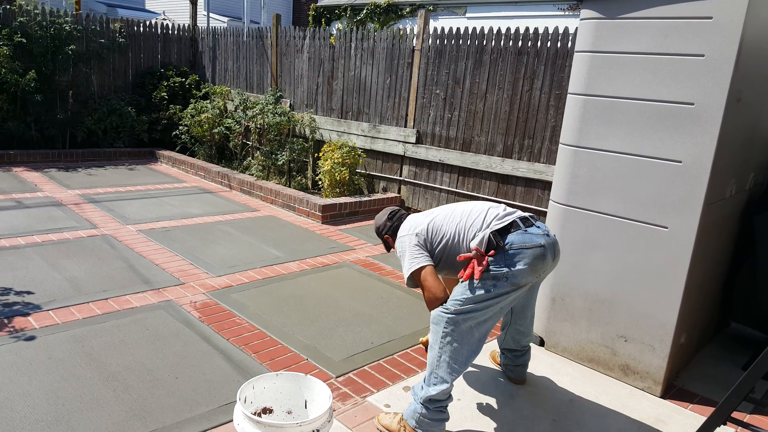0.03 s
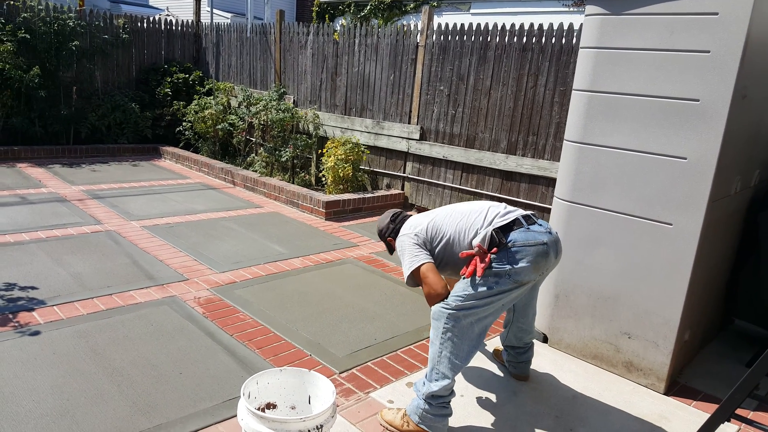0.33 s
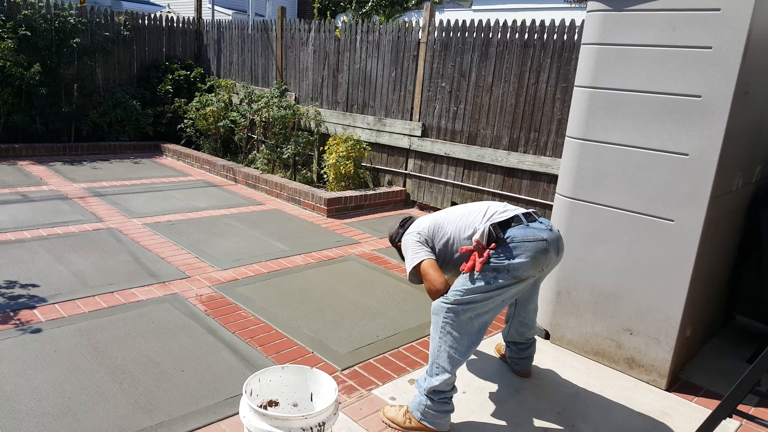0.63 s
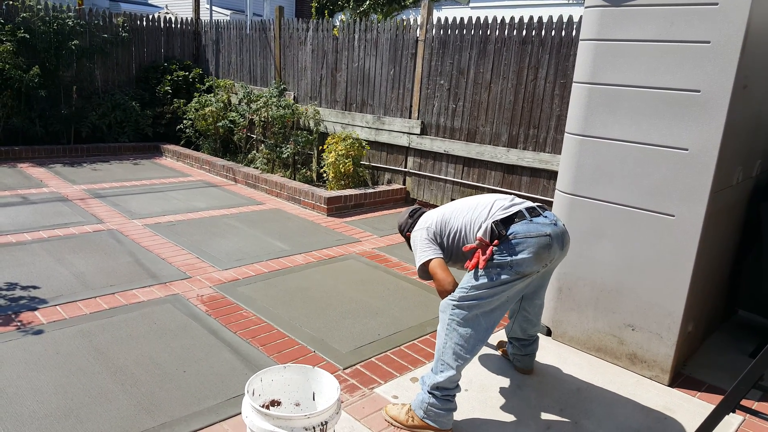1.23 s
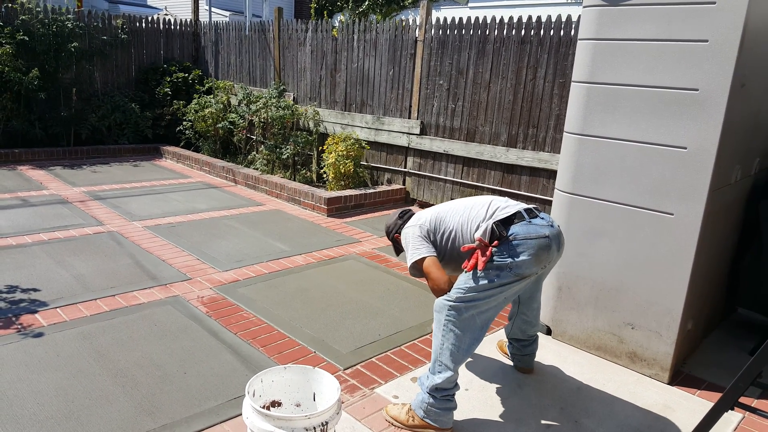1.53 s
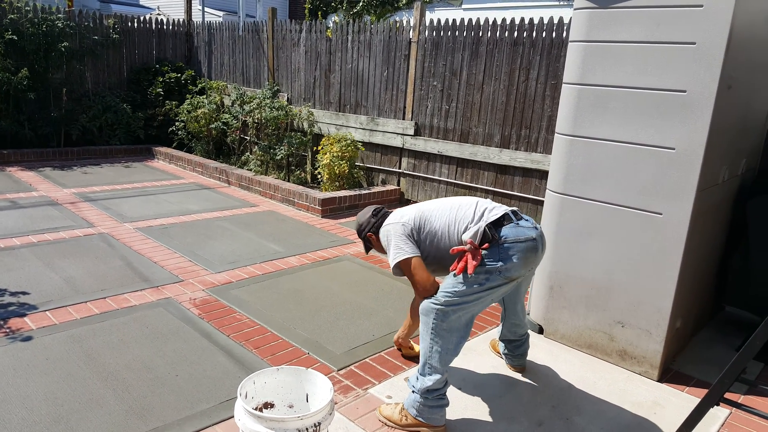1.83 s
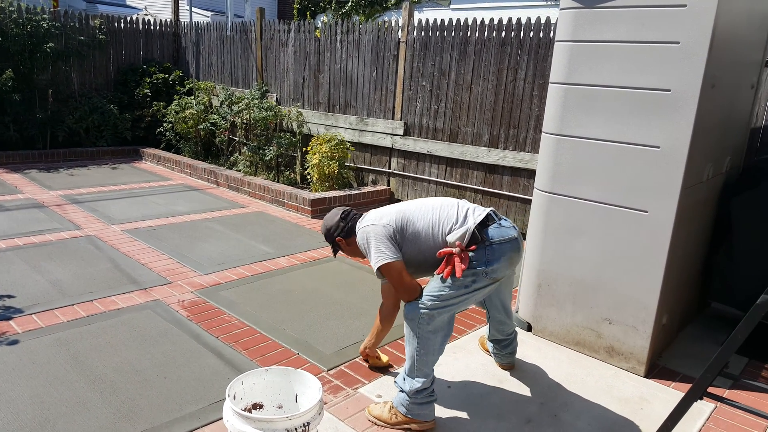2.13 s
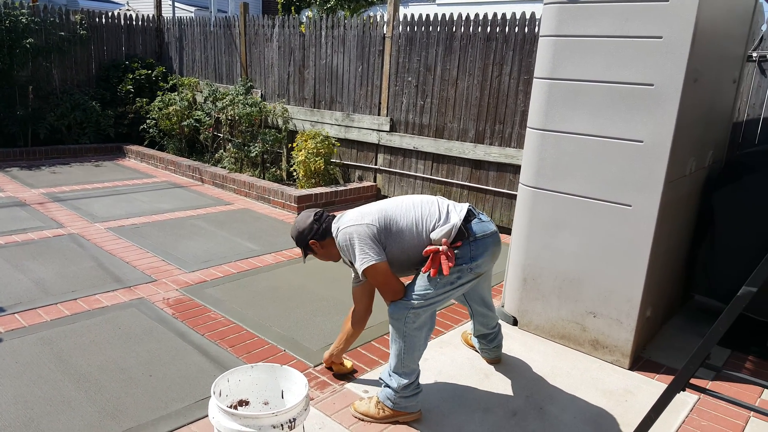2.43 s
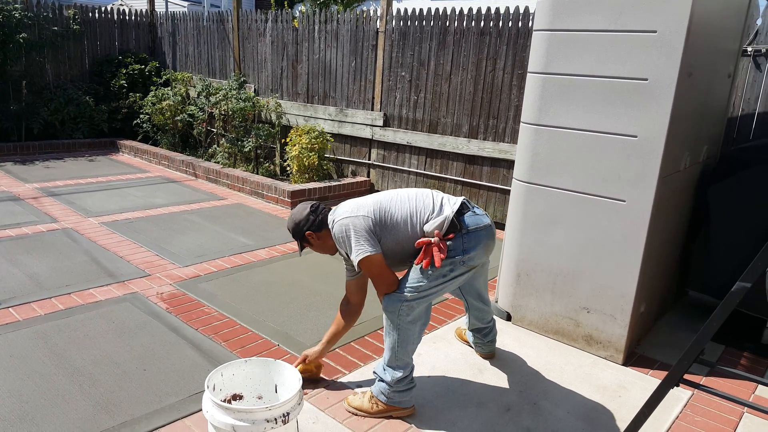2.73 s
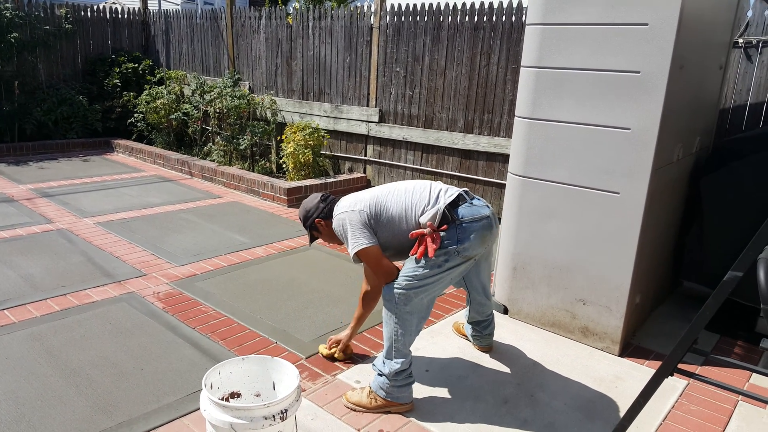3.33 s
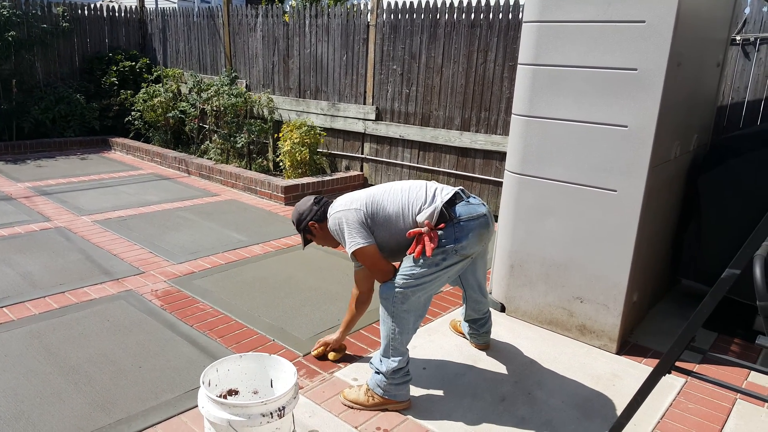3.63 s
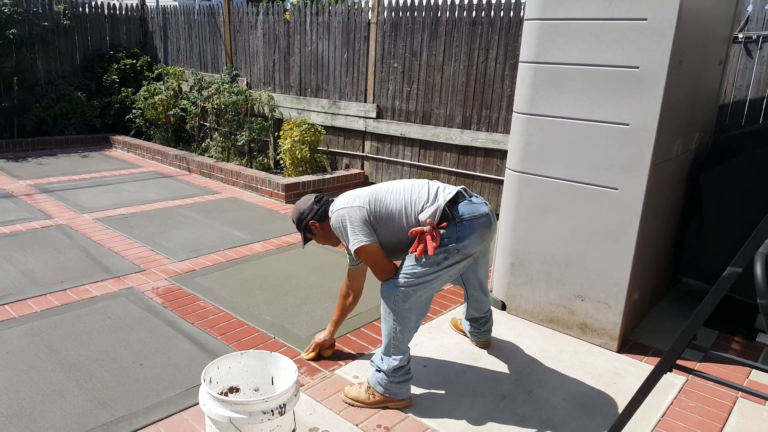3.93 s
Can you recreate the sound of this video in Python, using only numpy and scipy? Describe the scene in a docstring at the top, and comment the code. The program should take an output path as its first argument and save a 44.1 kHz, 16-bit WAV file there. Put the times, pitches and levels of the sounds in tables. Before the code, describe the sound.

A hand pad scrubs gritty brick in a fenced backyard. After a brief scuff, something hollow bumps and rattles twice; then come one long sandy stroke and a few short wipes, in front of the microphone over a low rumble.

```python
"""A brief scuff, then something hollow is bumped out of sight and rattles; a second bump follows.
In front of a stereo microphone in a fenced backyard, a worker scrubs gritty brick joints with a hand
pad: one long stroke and a few short wipes. Sand grains rasp, hiss and tick under the pad, and paving,
wall and fence throw the sound back. Behind it lie a low outdoor rumble, the hum of a distant machine,
a faint high whine and a thin, far-off hiss."""
import sys
import numpy as np
from scipy import signal
from scipy.fft import rfft, irfft
from scipy.io import wavfile
from scipy.ndimage import uniform_filter1d

SR = 44100
rng = np.random.default_rng(int(sys.argv[2]) if len(sys.argv) > 2 else 0)


def persist_wave(psi):
    """Save psi, clipped to +-1, as 16-bit WAV."""
    counts = np.round(np.clip(psi, -1, 1) * 32767).astype(np.int16)
    wavfile.write(sys.argv[1], SR, np.atleast_2d(counts).T)


N = 176400
T = np.arange(N) / SR


# The long stroke on the brick (time [s], rasp [dB], hiss [dB], resonance [Hz], its height [dB])
LONG_STROKE = [(1.40, -61.5, -72, 2550, 2), (1.55, -53, -56.5, 2700, 7), (1.75, -52, -55, 2680, 6),
               (2.05, -51.5, -55, 2760, 7.5), (2.32, -48, -54.5, 2800, 1.5), (2.40, -49, -56.5, 2050, -2),
               (2.49, -48.5, -54, 2020, 4), (2.57, -47, -53.5, 1800, 4), (2.63, -45.5, -53.5, 1500, 0.5),
               (2.69, -54.5, -56.5, 1950, -1), (2.78, -74, -71, 1950, 1)]
# Short wipes and catches of the pad (peak time [s], rise [s], fall [s], rasp [dB], hiss [dB],
# resonance [Hz], its height [dB], hiss tilt [dB/octave])
WIPES = [(.005, 0.023, 0.0077, -54, -54, 2006, -7, -1.5), (.88, 0.099, 0.079, -55.5, -63.5, 1650, 6, 3),
         (.94, 0.097, 0.061, -59.5, -72, 2600, 9, 10), (1.015, 0.027, 0.014, -75, -57, 2630, 8, 1),
         (1.369, .012, .0098, -53, -59.5, 1650, 8, -3), (1.703, 0.013, 0.0086, -58, -51.5, 2500, -3, 8),
         (2.335, 0.024, 0.013, -52, -53.5, 2900, -5, -3), (2.416, 0.01, 0.0052, -43, -51, 1700, 1, 0),
         (2.635, 0.033, .012, -60, -53, 1950, 7, -1), (3.095, 0.064, .062, -60.5, -59.5, 2080, 7, 3),
         (3.165, 0.048, 0.051, -55, -56.5, 2100, 3, 1), (3.745, .077, .033, -70, -63, 2000, 4, 0.5)]
# Spectrum of the pad's rasp (frequency [Hz], relative level [dB])
RASP_SPECTRUM = [(250, -50), (600, -9.5), (1000, -.5), (1400, -3), (1900, 4.5), (2250, 2), (2850, 0),
                 (3400, -5.5), (3950, -4.5), (4600, -10.5), (7000, -15), (15000, -45)]
# Spectrum of the sand's hiss (frequency [Hz], relative level [dB])
HISS_SPECTRUM = [(1200, -35), (3000, -8), (4200, 1), (5700, 0.5), (7500, -2), (8300, -2.5), (8950, 1),
                 (9450, -0.5), (10000, 1.5), (10700, -3), (11400, -2), (12100, -4), (12800, -2.5),
                 (13700, -6), (14250, -4.5), (15700, -12)]
# Glide of the hiss peaks as the hand moves (time [s], frequency factor [ratio])
HISS_GLIDE = [(1.0, 0.88), (1.5, 0.98), (1.75, 0.93), (2.0, 1.0), (2.3, 1.005), (2.6, 1), (3.2, .985)]

def scrubbing(judder_db=0.9, judder_hz=55.3, patch_db=0.03, tilt_pivot_hz=8000):
    """The pad on brick: a resonant rasp and a sandy hiss, both juddering as the pad catches."""
    times, rasp_db, hiss_db, centre_hz, height_db = np.transpose(LONG_STROKE)
    stroking = (T > times[0]) & (T < times[-1])
    rasp_power = stroking * amp(np.interp(T, times, rasp_db)) ** 2
    hiss_power = stroking * amp(np.interp(T, times, hiss_db)) ** 2
    friction = np.array([colour(grit(), RASP_SPECTRUM), grit()])
    hz, t, (rasp_bins, hiss_bins) = signal.stft(friction, SR, nperseg=512)
    hz = hz[:, None] + 1
    stroke_ring = pad_resonance(hz, np.interp(t, times, centre_hz), np.interp(t, times, height_db))
    # Overlapping strokes share resonance and tilt in proportion to their power.
    ring = np.interp(t, T, rasp_power) * stroke_ring
    tilt = np.zeros(N)
    for peak, rise, fall, wipe_rasp_db, wipe_hiss_db, ring_hz, ring_db, tilt_db in WIPES:
        swell = np.exp(-((T - peak) / np.where(T < peak, rise, fall)) ** 2)
        wipe_rasp, wipe_hiss = swell * amp(wipe_rasp_db) ** 2, swell * amp(wipe_hiss_db) ** 2
        rasp_power += wipe_rasp
        hiss_power += wipe_hiss
        tilt += wipe_hiss * tilt_db
        ring += np.interp(t, T, wipe_rasp) * pad_resonance(hz, ring_hz, ring_db)
    rasp_bins *= np.sqrt((ring + 1e-20) / (np.interp(t, T, rasp_power) + 1e-20))
    rasp_bins *= amp(patch_db * patches(rasp_bins.shape))
    slope_db = np.interp(t, T, tilt / (hiss_power + 1e-12)) * np.log2(hz / tilt_pivot_hz)
    hiss_bins *= amp(at_hz(HISS_SPECTRUM, hz / at_time(HISS_GLIDE, t)) + np.clip(slope_db, -10, 10))
    rasp, hiss = (unit(signal.istft(bins, SR, nperseg=512)[1][:N]) for bins in (rasp_bins, hiss_bins))
    judder = amp(judder_db * wander(judder_hz))
    return (np.sqrt(rasp_power) * rasp + np.sqrt(hiss_power) * hiss) * judder


def grit(grains_per_s=2100, spread_db=4.5, grain_share=0.63):
    """Dense sand impacts of uneven size over the smooth rub of the pad."""
    sizes = amp(spread_db * np.minimum(rng.exponential(1, N), 4))
    grains = sizes * rng.choice([-1, 1], N) * (rng.random(N) < grains_per_s / SR)
    return np.sqrt(grain_share) * unit(grains) + np.sqrt(1 - grain_share) * rng.standard_normal(N)


def pad_resonance(hz, centre_hz, height_db, width_oct=0.16):
    """Power gain of the pad's resonance."""
    return amp(height_db * np.exp(-(np.log2(hz / centre_hz) / width_oct) ** 2)) ** 2


# Grains snapping under the pad (time [s], rms level over span_s [dB], pitch [Hz], width [octaves])
SAND_TICKS = [(2.228, -50, 2980, 0.47), (2.603, -42.5, 5700, 0.63), (2.612, -49, 9000, 1),
              (2.638, -55, 13000, .6), (2.652, -42, 4000, 1.9), (2.813, -49, 3500, 1.9),
              (2.819, -57, 2000, 1.9), (2.890, -56, 2000, 1.3), (2.985, -56.5, 3500, 3.1),
              (3.04, -48.5, 1890, 0.72), (3.06, -52, 5500, 0.44), (3.324, -51.5, 6100, 1.5),
              (3.408, -53, 4500, 0.99), (3.422, -51, 6040, 0.46)]

def sand_ticks(rise_s=0.0003, decay_s=0.0023, span_s=0.005, top_hz=10000):
    """Larger grains snap, each with a dry, broad click."""
    out, size = np.zeros(N), 1024
    t, hz = T[:size], np.fft.rfftfreq(size, 1 / SR)
    for start, db, pitch_hz, width_oct in SAND_TICKS:
        band = 1 / (1 + (np.log2((hz + 1) / pitch_hz) / width_oct) ** 2) ** 1.5
        band /= np.sqrt(1 + (hz / top_hz) ** 4)
        crack = rng.standard_normal(size) * np.exp(-t / decay_s) * (1 - np.exp(-t / rise_s))
        phase = np.angle(rfft(crack))
        snap = irfft(band * np.exp(1j * phase)) * (1 - t / t[-1])
        add(out, start, amp(db) * unit(snap) * np.sqrt(span_s / t[-1]))
    return out


# Two bumps out of sight, each a run of knocks (time [s], boom gain [dB], clatter gain [dB])
KNOCKS = [(.251, -33, -41), (.260, -25.5, -46), (0.287, -31, -54), (0.313, -24, -44), (.352, -27, -50.5),
          (.409, -35, -48.5), (0.42, -29.5, -62), (1.356, -29.5, -45), (1.391, -25, -46),
          (1.415, -27.5, -43.5), (1.467, -33, -41), (1.480, -26.5, -44.5), (1.505, -28.5, -51.5)]
# Modes of the hollow body (frequency [Hz], relative level [dB], time to fall 60 dB [s])
HOLLOW_MODES = [(133.4, -9, 0.24), (211, 1.5, 0.12), (213.6, -11, 0.54), (260, -6, 0.08), (360, -24, 0.081),
                (550, -27, 0.23), (838, -24.5, 0.15), (1036, -25, 0.073)]
# Spectrum of its rattle (frequency [Hz], relative level [dB])
CLATTER_SPECTRUM = [(150, -11), (300, 7), (480, -0.5), (700, -1.5), (1000, 2), (1600, -6), (2600, -10),
                    (4000, -19), (7000, -28), (15000, -52)]
# The knocks at the microphone (frequency [Hz], left minus right [dB])
KNOCK_BALANCE = [(120, 1.5), (220, 4), (600, 0.5), (1200, -2), (3000, -3), (9000, 2)]

def hollow_knocks(boom_rise_s=0.007, clatter_rise_s=0.00059, clatter_t60_s=0.24):
    """Each knock swells the hollow modes and shakes out a clatter that scatters round the yard."""
    booms, clatters, t = np.zeros(N), np.zeros(N), T[:SR // 2]
    boom = sum(amp(db - 60 * t / t60) * np.sin(2 * np.pi * hz * t) for hz, db, t60 in HOLLOW_MODES)
    for start, boom_db, clatter_db in KNOCKS:
        clatter = colour(rng.standard_normal(len(t)), CLATTER_SPECTRUM) * amp(-60 * t / clatter_t60_s)
        add(booms, start, amp(boom_db) * boom * (1 - np.exp(-t / boom_rise_s)))
        add(clatters, start, amp(clatter_db) * clatter * (1 - np.exp(-t / clatter_rise_s)))
    return yard(booms, KNOCK_BALANCE, echo_db=-37) + yard(clatters, KNOCK_BALANCE, echo_db=2.5)


def yard(sound, balance, echo_db, patterns=1, right_delay_s=0.00007):
    """Direct sound at the microphone, plus echoes; several patterns blend for a moving source."""
    weights = np.ones((1, N))
    if patterns > 1:
        weights = np.array([wander(rate_hz=11.7) for _ in range(patterns)])
    weights /= np.linalg.norm(weights, axis=0)
    echoes = sum(signal.fftconvolve((sound * w)[None], yard_echoes(), axes=1)[:, :N] for w in weights)
    hz = np.fft.rfftfreq(N, 1 / SR)
    direct = rfft(sound) * np.exp(-2j * np.pi * hz * np.array([[0], [right_delay_s]]))
    at_microphone = (direct + amp(echo_db) * rfft(echoes)) * sides(at_hz(balance, hz))
    return irfft(at_microphone, N) / np.hypot(1, amp(echo_db))


# Decay of the fenced yard (frequency [Hz], time to fall 60 dB [s])
YARD_T60 = [(100, 0.16), (1000, 0.11), (4000, 0.14), (15000, 0.19)]

def yard_echoes(slap_share=0.28, size=16384):
    """Slaps from paving, wall and fence, and a short tail, for each side of the microphone."""
    taps = rng.choice([-1., 1.], (2, size)) * (rng.random((2, size)) < 0.08)
    hz, t, bins = signal.stft(taps, SR, nperseg=256)
    tail = signal.istft(bins * amp(-60 * t / at_hz(YARD_T60, hz)[:, None]), SR, nperseg=256)[1]
    tail /= np.linalg.norm(tail, axis=1, keepdims=True)
    slaps = np.zeros_like(tail)
    for side in slaps:
        side[rng.integers(60, 1100, 9)] = rng.choice([-1, 1], 9) / 3  # nine slaps within 25 ms
    return np.sqrt(slap_share) * slaps + np.sqrt(1 - slap_share) * tail


# Spectrum of the open air around the yard (frequency [Hz], relative level [dB])
AIR_SPECTRUM = [(12, -52), (20, -40), (54, -8), (87, -9), (103, -8), (122, -3), (153, -12), (191, -11),
                (259, -15.5), (289, -19), (372, -21), (519, -27.5), (1100, -36), (1630, -39.5), (3200, -46),
                (3850, -46), (4700, -50.5), (7500, -57.5), (10500, -59), (12800, -58.5), (15500, -60.5)]
# Drift of its treble (time [s], relative level [dB])
AIR_TREBLE = [(0, 10), (.25, 8), (.6, 8.5), (1.15, 5.5), (3, 8), (4, 5.5)]
# Drift of its bass (time [s], relative level [dB])
AIR_BASS = [(0, 0.15), (2, -0.5), (4, -0.4)]
# Likeness of the air on the two sides (frequency [Hz], correlation [0 to 1])
AIR_LIKENESS = [(20, 1), (150, 1), (300, 0.86), (600, 0.44), (1200, 0), (15000, 0)]
# The air at the microphone (frequency [Hz], left minus right [dB])
AIR_BALANCE = [(40, -5.5), (120, 3), (300, 0), (700, 1), (1500, -1.5), (4000, -2), (8000, 2), (15000, 2)]

def outdoor_air(level_db=-47, patch_db=2, crossover_hz=900):
    """Outdoor rumble, alike on both sides of the microphone, under a wide soft hiss."""
    hz, t, (left, other) = signal.stft(rng.standard_normal((2, N)), SR, nperseg=2048, noverlap=1536)
    likeness = at_hz(AIR_LIKENESS, hz)[:, None]
    right = likeness * left + np.sqrt(1 - likeness ** 2) * other
    treble_share = (hz / (hz + crossover_hz))[:, None]
    drift_db = treble_share * at_time(AIR_TREBLE, t) + (1 - treble_share) * at_time(AIR_BASS, t)
    shape_db = at_hz(AIR_SPECTRUM, hz)[:, None] + drift_db + patch_db * patches(left.shape)
    bins = np.array([left, right]) * sides(at_hz(AIR_BALANCE, hz))[:, :, None]
    bins *= amp(shape_db) / np.sqrt((1 + likeness) / 2 + 1e-6)
    return amp(level_db) * unit(signal.istft(bins, SR, nperseg=2048, noverlap=1536)[1][:, :N])


# Tones of the distant machine (frequency [Hz], level [dB], level waver [dB], phase wander [rad],
# waver rate [Hz], left minus right [dB])
HUM_TONES = [(119.6, -49.5, -0.5, 0.35, 6.9, 2), (291.3, -61.5, 4, 0.94, 15.7, 6.5),
             (56.5, -60.5, 2, 1.3, 14, 2)]

def machine_hum():
    """A machine hums in the distance, each tone wavering in level and phase."""
    out = np.zeros((2, N))
    for hz, db, waver_db, drift_rad, rate_hz, pan_db in HUM_TONES:
        tone = np.sin(2 * np.pi * hz * T + drift_rad * wander(rate_hz))
        tone *= amp(waver_db * wander(rate_hz))
        out += sides(pan_db)[:, None] * amp(db) * unit(tone)
    return out


# Pitch of the high whine (time [s], frequency [Hz])
WHINE_PITCH = [(0, 12660), (1.3, 12800), (2.9, 12600), (3.7, 12750), (4, 12800)]

def whine(level_db=-86.5, waver_hz=44.7, pan_db=18):
    """A faint, thin whine to the left of the microphone drifts up and down in pitch."""
    hz = at_time(WHINE_PITCH, T) + waver_hz * wander(rate_hz=70)
    return sides(pan_db)[:, None] * amp(level_db) * unit(np.sin(2 * np.pi * np.cumsum(hz) / SR))


# Spectrum of the far-off hiss (frequency [Hz], relative level [dB])
FAR_HISS_SPECTRUM = [(3500, -32), (4600, -10), (5100, 1), (5700, -20), (6300, -9), (7000, -47), (9000, -45)]
# Its swells at the microphone (time [s], level [dB])
FAR_HISS_LEVEL = [(0, -69), (.22, -71.5), (.5, -87), (3.2, -79), (3.55, -74), (4, -94)]

def far_hiss():
    """A faint, narrow, far-off hiss comes and goes."""
    hiss = np.array([colour(noise, FAR_HISS_SPECTRUM) for noise in rng.standard_normal((2, N))])
    return amp(at_time(FAR_HISS_LEVEL, T)) * hiss


def amp(db):
    """Decibels to amplitude."""
    return 10 ** (np.asarray(db) / 20)


def unit(x):
    """Scales to rms 1."""
    return x / np.sqrt(np.mean(x ** 2) + 1e-20)


def at_hz(table, hz):
    """Reads a table along log frequency."""
    frequencies, values = np.transpose(table)
    return np.interp(np.log(hz + 1), np.log(frequencies + 1), values)


def at_time(table, t):
    """Reads a table along time."""
    return np.interp(t, *np.transpose(table))


def add(mix, start_s, sound):
    """Mixes a sound in at its start time."""
    part = mix[max(round(start_s * SR), 0):][:len(sound)]
    part += sound[:len(part)]


def sides(db):
    """Left and right gains for a level difference."""
    return amp(np.array([db / 2, -db / 2]))


def colour(x, spectrum):
    """Gives a sound a spectrum, at rms 1."""
    return unit(irfft(rfft(x) * amp(at_hz(spectrum, np.fft.rfftfreq(len(x), 1 / SR))), len(x)))


def wander(rate_hz):
    """Smooth random motion, rms 1."""
    hz = np.fft.rfftfreq(N, 1 / SR)
    return unit(irfft(rfft(rng.standard_normal(N)) * np.exp(-(hz / rate_hz) ** 2) * (hz > 0), N))


def patches(shape):
    """Random blotches over frequency and time."""
    across_frequency = uniform_filter1d(rng.standard_normal(shape), size=7, axis=0)
    return unit(uniform_filter1d(across_frequency, size=9, axis=1))


# The pad and its sand at the microphone (frequency [Hz], left minus right [dB])
SCRUB_BALANCE = [(300, 5), (1300, -2), (2400, -2.5), (4400, -1.5), (8000, 2.5), (15000, 4)]

def scene():
    """The backyard from the microphone's place: scrubbing and knocks over the background."""
    pad = yard(scrubbing(), SCRUB_BALANCE, echo_db=3, patterns=8)
    sand = yard(sand_ticks(), SCRUB_BALANCE, echo_db=-8)
    return pad + sand + hollow_knocks() + outdoor_air() + machine_hum() + whine() + far_hiss()


def record(dry):
    """The recorder's band limit cuts the highest treble."""
    cutoff_hz = 15750
    lowpass = signal.firwin(1023, cutoff_hz, window=("kaiser", 9), fs=SR)
    return signal.oaconvolve(dry, lowpass[None], "same")


dry = scene()
out = record(dry)
persist_wave(out)
```